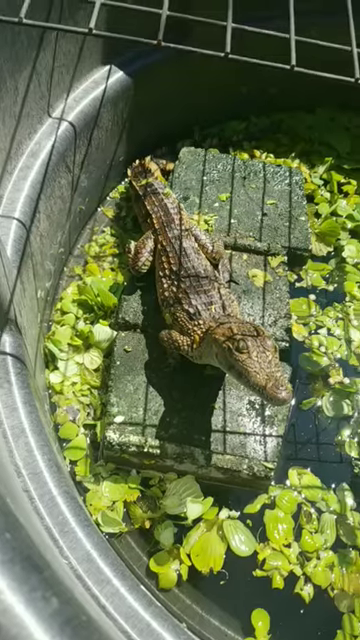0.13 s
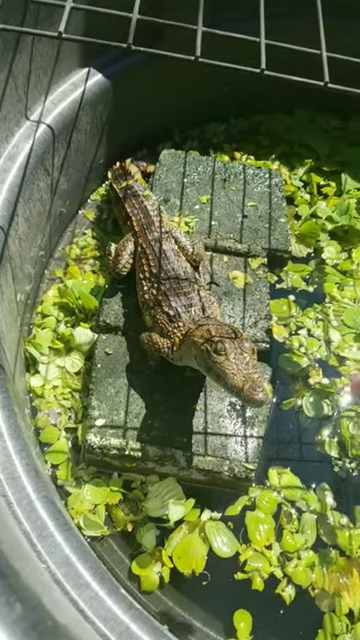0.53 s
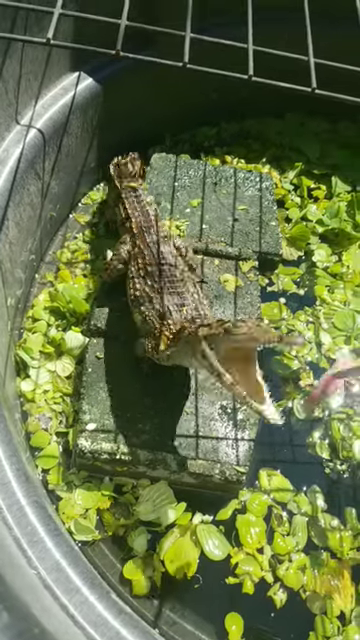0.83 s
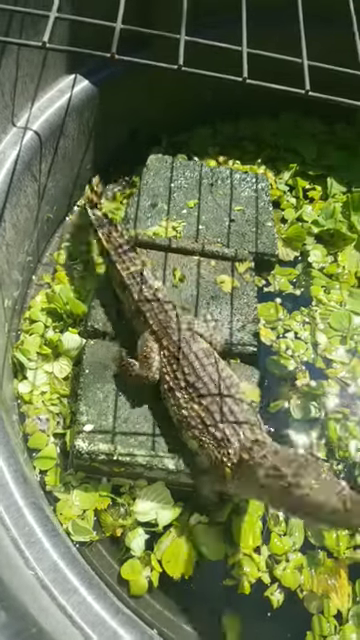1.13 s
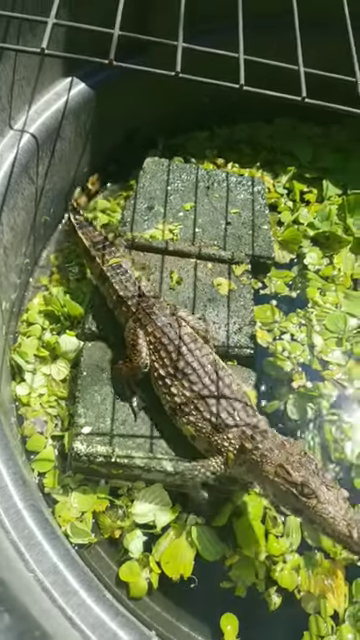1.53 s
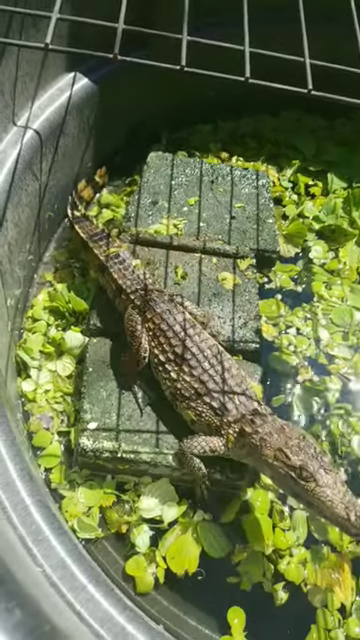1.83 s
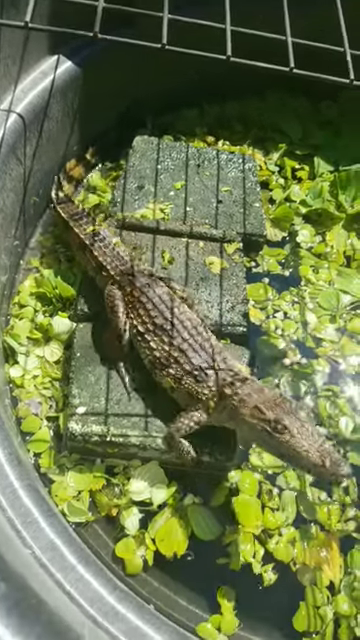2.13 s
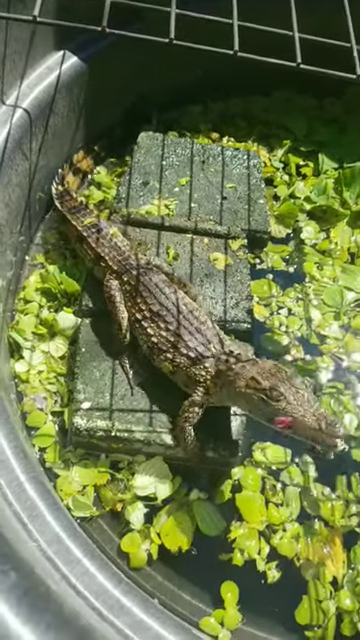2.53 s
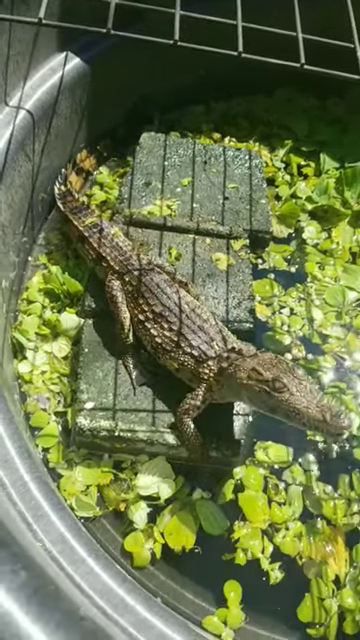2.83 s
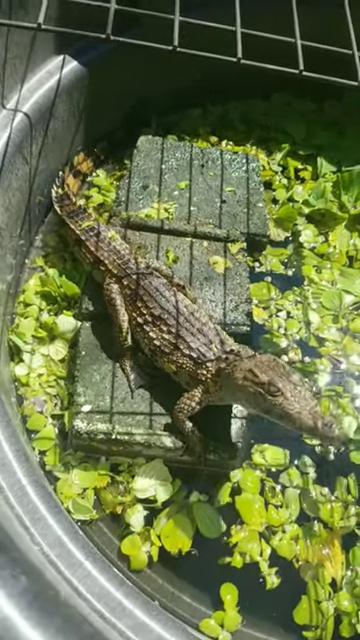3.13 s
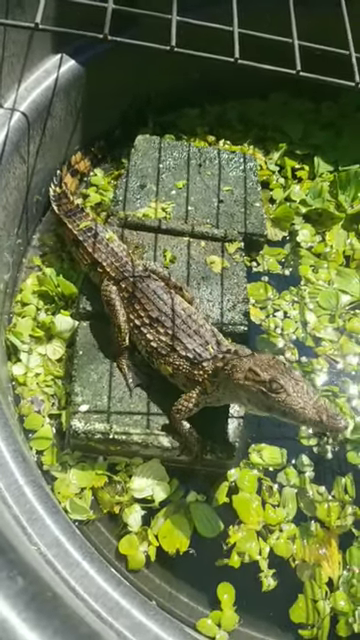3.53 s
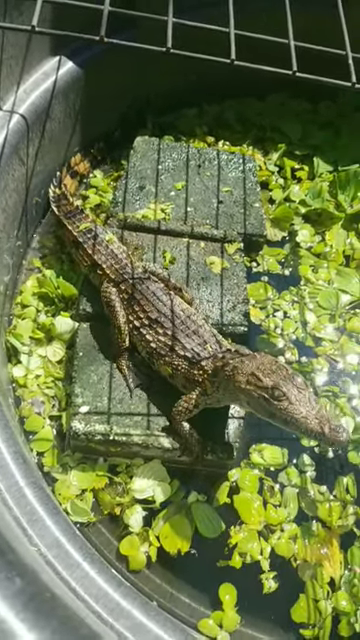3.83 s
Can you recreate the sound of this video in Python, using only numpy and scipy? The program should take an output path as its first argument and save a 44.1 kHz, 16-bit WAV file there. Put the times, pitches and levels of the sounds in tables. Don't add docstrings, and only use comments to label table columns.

```python
import sys
import numpy as np
from scipy import signal
from scipy.fft import rfft, irfft, next_fast_len
from scipy.io import wavfile
from scipy.ndimage import uniform_filter1d

SR = 44100
rng = np.random.default_rng(int(sys.argv[2]) if len(sys.argv) > 2 else 0)


def nominal_scale(level):
    x = np.asarray(level, float) / 20
    return 10 ** x


def inscribe(sig):
    pcm = np.round(np.clip(np.atleast_2d(sig).T, -1, 1) * 32767)
    wavfile.write(sys.argv[1], SR, pcm.astype(np.int16))


N = 176400

# time in seconds, gain in dB.
FADE = [(.158, -62.5), (.165, -35), (.19, -18.5), (.25, -10), (.35, -6), (.45, -1), (.6, -0.5), (.9, 1)]
PUFF_RISE_S = .0003


def unit(x):
    return x / np.sqrt(np.mean(x ** 2) + 1e-20)


def filtered(x, response):
    size = next_fast_len(len(x) + 8192)
    spectrum = rfft(x, size) * response(np.fft.rfftfreq(size, 1 / SR))
    return irfft(spectrum, size)[:len(x)]


def noise(points, patchy_db):
    grid = signal.stft(rng.standard_normal(N), nperseg=512)[2]
    field = uniform_filter1d(rng.standard_normal(grid.shape), 6, 0)
    field = uniform_filter1d(field, 8, 1)
    patchy = signal.istft(grid * nominal_scale(patchy_db * unit(field)), nperseg=512)[1][:N]
    point_hz, point_db = np.transpose(points)
    return unit(filtered(patchy, lambda hz: nominal_scale(np.interp(np.log(hz + 1), np.log(point_hz + 1), point_db))))


def peaks(rows):
    def response(f):
        return sum((-1) ** k * nominal_scale(db) * 1j * f * width / (hz * hz - f * f + 1j * f * width)
                   for k, (hz, width, db) in enumerate(rows))
    return response


def swell(rise_s, hold_s, t60):
    t = np.arange(SR * 2 // 25) / SR
    return (1 - np.exp(-t / rise_s)) * nominal_scale(-60 * np.maximum(t - hold_s, 0) / t60)


def add(out, s, x):
    part = out[round(s * SR):][:len(x)]
    part += x[:len(part)]


def scatter(db, lo_hz, hi_hz, count):
    spread_db = 2.2
    u = rng.random((count, 3))
    level = db - spread_db * np.log(1 - .97 * u[:, 1])
    return np.c_[u[:, 0] * N / SR, level, lo_hz * (hi_hz / lo_hz) ** u[:, 2]]


def pump_rumble(fade):
    # frequency in Hz, level in dB per Hz.
    rumble_tone = [(15, -56), (25, -21), (54, -6), (70, 1), (92, -6), (129, -0.5), (178, -13), (279, -16.5),
                   (300, -32), (390, -85), (660, -120)]
    # time in seconds, level in dB.
    pump_swells = [(0.2, -59), (0.46, -38.5), (1.49, -33.5), (1.52, -37), (1.69, -30.5), (1.72, -35),
                   (1.77, -29.5), (1.86, -34), (3.44, -33), (3.91, -35), (3.94, -31.5), (4.0, -33)]
    level = nominal_scale(np.interp(np.arange(N) / SR, *np.transpose(pump_swells)))
    return level * np.minimum(fade * 15, 1) * noise(rumble_tone, patchy_db=.3)


def hum():
    return nominal_scale(-46) * np.sin(2 * np.pi * 120 * np.arange(N) / SR)


def fizzing(hiss):
    fizz_hz, steady, fizz_t60 = 3600, .75, .045
    kicks = np.zeros(N)
    s, size = rng.random((260, 2)).T
    np.add.at(kicks, (s * N).astype(int), .3 + size)
    gain = unit(steady + signal.fftconvolve(kicks, swell(.0005, .004, fizz_t60))[:N])
    treble = filtered(hiss, lambda hz: 1 / (1 + (fizz_hz / (hz + 1)) ** 4))
    return hiss + (gain - 1) * treble


def water_hiss():
    # frequency in Hz, level in dB per Hz.
    hiss_tone = [(150, -7), (260, -1.5), (615, -5.5), (1000, -12), (3070, -17.5), (9000, -33.5),
                 (12000, -29.5), (15800, -29)]
    hiss = fizzing(noise(hiss_tone, patchy_db=1.6))
    whistle = filtered(hiss, peaks([(3125, 60, 3)]))
    return nominal_scale(-41) * (hiss + whistle)


def drops(rows, width_hz, band_share, trim_db, wide_db):
    # centre in Hz, width in Hz, level in dB.
    tub_modes = [(2180, 100, 9), (3120, 120, 9), (4250, 250, 3), (4850, 200, 3)]
    tick, strike = 1.3, 15
    envelope = swell(PUFF_RISE_S, .005, .04) + tick * swell(.0001, .0001, .0027)
    own, wide = np.zeros(N), np.zeros(N)
    for s, db, hz in rows:
        puff = rng.standard_normal(len(envelope)) * envelope
        puff[2] += strike
        band = peaks([(0.98 * hz, band_share * hz, 0)])
        narrow = filtered(puff, peaks([(hz, width_hz, 0)]))
        broad = filtered(puff, lambda f: band(f) ** 2)
        add(own, s, nominal_scale(db + trim_db) * narrow / np.abs(narrow).max())
        add(wide, s, nominal_scale(db + trim_db + wide_db) * broad / np.abs(broad).max())
    return own + wide + filtered(wide, peaks(tub_modes))


def spray():
    # frequency in Hz, level in dB per Hz.
    mist_tone = [(2500, -30), (4500, -6), (7000, -6), (9300, -9), (12000, 0), (15800, -3)]
    # start in seconds, peak level in dB.
    splashes = [(0.8845, -30), (0.978, -30), (1.0005, -25.5), (1.1406, -29), (1.21, -30.5), (1.346, -27),
                (1.542, -33), (1.8313, -21.5), (1.9508, -30), (2.0845, -28), (2.1237, -24), (2.1848, -24),
                (2.34, -27.5), (2.3893, -26), (2.4846, -27), (2.6492, -30), (2.8586, -32), (2.9555, -38),
                (3.0149, -28), (3.1062, -26.5), (3.1321, -26.5), (3.388, -24), (3.5138, -25), (3.5741, -26),
                (3.6445, -29), (3.67, -18.5), (3.8106, -36), (3.827, -22.5), (3.9178, -24), (3.979, -27),
                (0.2573, -50), (0.3444, -29), (0.4544, -42), (0.4918, -29), (0.699, -32.5),
                      (0.91, -25), (1.0444, -27.5), (1.256, -31), (1.7838, -32), (2.2944, -39),
                      (2.557, -29), (2.7136, -29.5), (3.2919, -52), (3.3443, -40), (3.4301, -30),
                      (3.462, -45), (3.6037, -50), (3.701, -26), (3.738, -31), (3.856, -28), (3.941, -74)]
    # start in seconds, peak level in dB.
    flecks = [(0.6714, -42), (0.8315, -47), (0.861, -38), (1.482, -39), (1.5574, -33), (1.6038, -36),
              (1.6496, -40), (1.6891, -41), (1.721, -40), (1.8038, -43), (1.8562, -38), (2.2838, -35.5),
              (2.4239, -38), (2.4494, -38), (2.5794, -39), (2.6174, -48), (2.8075, -45), (2.8844, -35),
              (3.2115, -38), (3.235, -42), (3.3644, -32), (3.484, -35), (3.7249, -37), (3.907, -42),
              (3.9644, -40)]
    # start in seconds, peak level in dB.
    clicks = [
        (0.8854, -29),
        (1.347, -42),
        (1.8332, -26),
        (3.5128, -27),
        (3.5734, -39),
    ]
    gate = np.zeros(N)
    puff = swell(PUFF_RISE_S, .005, .03) + 1.2 * swell(.0001, .0003, .004)
    for s, db in splashes:
        add(gate, s, nominal_scale(db - 16) * puff)
    for s, db in flecks:
        add(gate, s, nominal_scale(db - 10.5) * puff)
    for s, db in clicks:
        add(gate, s, nominal_scale(db - 5) * swell(.0001, .001, .006))
    tiny = scatter(-52, 4500, 15000, count=120)
    droplets = drops(tiny, width_hz=1200, band_share=.4, trim_db=0, wide_db=-4)
    return gate * noise(mist_tone, patchy_db=4.5) + droplets


def drips():
    # start in seconds, peak level in dB, bubble pitch
    # in Hz.
    light_drips = [(0.4974, -31, 2180), (0.7558, -29, 2880), (0.7802, -29.5, 2060), (0.8321, -27, 2000),
                   (0.9139, -33, 2100), (1.0446, -27.5, 2880), (1.1783, -31.5, 2300), (1.2527, -25.5, 4250),
                   (1.3479, -20, 2940), (1.4826, -32, 3180), (1.5405, -34.5, 3030), (1.8338, -29, 3100),
                   (1.8568, -30, 2030), (1.9591, -29, 2880), (2.1267, -24, 4140), (2.2379, -29.5, 3740),
                   (2.2958, -25.5, 2990), (2.617, -32.5, 2150), (2.6495, -24.5, 4880),
                   (2.7143, -31.5, 2220), (2.7732, -30, 2170), (2.9618, -28, 3290), (3.0521, -30, 3240),
                   (3.294, -28.5, 2250), (3.3953, -27, 5270), (3.4646, -29.5, 2330), (3.514, -28.5, 3000),
                   (3.6702, -31, 2770), (3.8123, -23.5, 4080), (3.9445, -31.5, 2170),
                   (0.258, -30, 3700), (0.8347, -29, 2880), (2.697, -39, 2200), (0.3764, -32.5, 2280),
                   (0.397, -29.5, 3150), (0.4626, -34, 2350), (0.5706, -42, 4330), (0.968, -34.5, 5400),
                   (1.2238, -28, 3000), (1.4312, -32, 3240), (1.7843, -30.5, 2320), (1.892, -30, 3180),
                   (1.997, -36, 2940), (2.084, -33, 4100), (2.154, -28.5, 3340), (2.193, -30, 3360),
                   (2.5331, -36.5, 2170), (2.6286, -26.5, 3070), (2.922, -33.5, 4440), (3.1057, -29, 4900),
                   (3.1248, -29, 2440), (3.5587, -39, 3110), (3.584, -34.5, 1900), (3.6975, -33.5, 2330),
                   (3.737, -32.5, 3980), (3.8284, -30, 4300), (3.8576, -38.5, 2180),
                   (0.554, -38, 4310), (0.606, -28, 3990), (1.1288, -38.5, 3720), (1.148, -35, 3850),
                       (1.211, -46, 3810), (1.774, -32, 4870), (1.886, -38, 3800), (2.0703, -41, 4050),
                       (2.2883, -29, 3320), (2.3395, -35, 4970), (2.388, -42, 3890), (2.4723, -36, 4440),
                       (2.5611, -33.5, 3700), (2.579, -39, 4340), (2.7257, -29.5, 3710),
                       (2.7861, -35, 5000), (2.7994, -37, 3680), (2.859, -33.5, 4900), (2.8838, -39, 4260),
                       (2.955, -31.5, 7200), (2.989, -36, 3550), (3.1901, -35.5, 4600),
                       (3.235, -35.5, 4210), (3.269, -31, 5200), (3.344, -38.5, 4050), (3.4306, -41, 3840),
                       (3.5738, -42, 5320), (3.644, -44, 4330), (3.6701, -31, 4850), (3.7047, -33, 3530),
                       (3.91, -40, 4520), (3.9175, -40, 4820), (3.965, -32, 4730)]
    small = scatter(-37.5, 2110, 5600, count=45)
    rows = [*light_drips, *small]
    return drops(rows, width_hz=140, band_share=.85, trim_db=-6, wide_db=1)


def plops():
    # start in seconds, peak level in dB, bubble pitch in Hz.
    big_drops = [(0.934, -29, 594), (1.042, -28.5, 1160), (1.396, -27, 526), (1.747, -24.5, 670),
                 (1.785, -28, 555), (1.85, -27.5, 684), (2.05, -31.5, 670), (2.819, -27.5, 470),
                 (3.464, -25.5, 666), (3.478, -25, 715), (3.535, -27.5, 587), (3.595, -29, 600),
                 (3.716, -22.5, 733), (3.97, -27, 535)]
    rows = [*big_drops, *scatter(-38, 424, 1250, count=35)]
    return drops(rows, width_hz=80, band_share=1, trim_db=-4.5, wide_db=-43)


def smack(duration_s, hz, db, low_db):
    low_share, sharpness, grows_db = .46, .35, 3
    t = np.arange(SR // 8) / SR
    t = t[t < duration_s]
    wave = np.sin(2 * np.pi * hz * t) + nominal_scale(low_db) * np.sin(2 * np.pi * low_share * hz * t)
    wave = wave + sharpness * (wave ** 2 - np.mean(wave ** 2))
    progress = t / t[-1]
    return nominal_scale(db + grows_db * (progress - .5)) * np.sin(np.pi * progress) ** 0.3 * wave


def clucks():
    # smack start and pop start in seconds, smack and pop pitch in Hz, flutter delay in
    # seconds.
    cluck_rows = [
        (.6139, .6256, 635, 1390, .0052),
        (.7816, .7876, 705, 1430, .0044),
    ]
    # pop, smack, smack undertone and hiss level in dB, pop peakedness as an exponent.
    strengths = [
        (-11, -17.5, -4, -24, .5),
        (-6, -15, -2.5, -19, 1.15),
    ]
    # frequency in Hz, level in dB, 60 dB decay time in seconds.
    hollow_modes = [(218, -27, 0.13), (330, -18, 0.052), (416, -11.5, 0.061), (635, -24, 0.13),
                    (920, -35, .03), (1198, -17, 0.088), (1790, -16.5, 0.047)]
    # frequency in Hz, level in dB per Hz.
    smack_tone = [(1500, -26), (4000, -5), (7500, -9), (12500, 0), (16000, -2)]
    pop_s, pop_lead_s, pop_skew, pop_rise_s = .0052, .0007, .85, .003
    push_db, push_t60 = -10, .017
    flutter_db, flutter_loss_db = -12.5, 4
    hiss_t60, pop_hiss_db = .05, -13
    echo_t60, echo_db = .07, -22

    body, gate, t = np.zeros(N), np.zeros(N), np.arange(SR // 8) / SR
    for cluck, strength in zip(cluck_rows, strengths):
        start, pop, smack_hz, pop_hz, flutter_s = cluck
        pop_db, smack_db, low_db, hiss_db, roundness = strength
        add(body, start, smack(pop - start, smack_hz, smack_db, low_db))

        turn = 2 * np.pi * pop_hz * (t - pop_lead_s)
        arch = np.sin(np.pi * np.minimum(t / pop_s, 1) ** pop_skew).clip(0) ** roundness
        burst = nominal_scale(pop_db) * arch * np.cos(turn) * (t < pop_s)
        push = nominal_scale(push_db - 60 * t / push_t60) * np.cos(turn / 2) * (1 - np.exp(-t / .0003))
        add(body, pop, burst + push)

        for k, (late, db) in enumerate(rng.standard_normal((6, 2))):
            bounce = pop + (k + 1) * flutter_s + .0002 * late
            add(body, bounce, nominal_scale(flutter_db - flutter_loss_db * k + .8 * db) * burst)

        ring = -sum(nominal_scale(db - 60 * t / t60) * np.sin(2 * np.pi * hz * t) for hz, db, t60 in hollow_modes)
        add(body, pop, nominal_scale(pop_db) * ring * (1 - np.exp(-t / pop_rise_s)))

        add(gate, start - .001, nominal_scale(hiss_db - 7.5) * swell(.00024, .0019, hiss_t60))
        add(gate, pop, nominal_scale(hiss_db + pop_hiss_db) * swell(.00026, .00063, hiss_t60 / 2))

    tail = rng.standard_normal(len(t)) * nominal_scale(-60 * t / echo_t60) * (t > .004)
    echo = signal.fftconvolve(body, tail / np.linalg.norm(tail))[:N]
    return body + nominal_scale(echo_db) * echo + gate * noise(smack_tone, patchy_db=1.5)


def scene():
    fade = nominal_scale(np.interp(np.arange(N) / SR, *np.transpose(FADE)))
    water = hum() + water_hiss() + spray() + drips() + plops()
    return (pump_rumble(fade) + water * fade + clucks())[None]


def roll_off(x):
    return signal.sosfilt(signal.butter(12, 16800, fs=SR, output="sos"), x)


def record(dry):
    top_hz, edge_hz, above_db = 15530, 40, -42
    kept = filtered(dry[0], lambda hz: nominal_scale(above_db * (1 + np.tanh((hz - top_hz) / edge_hz)) / 2))
    started = np.arange(N) / SR > FADE[0][0]
    return roll_off((kept * started)[None])


dry = scene()
out = record(dry)
inscribe(out)
```